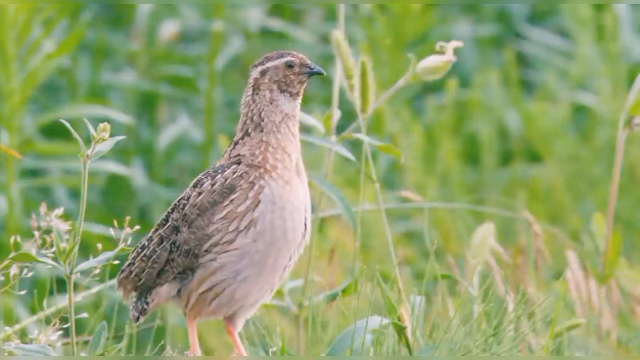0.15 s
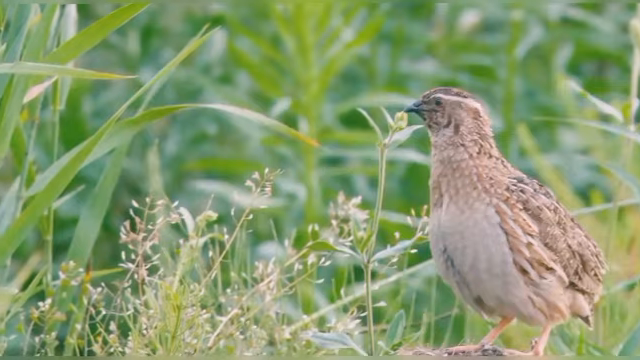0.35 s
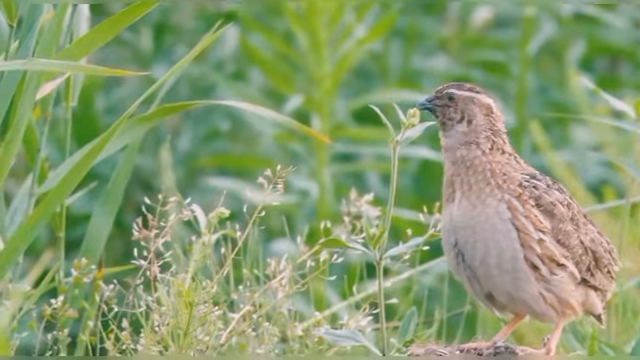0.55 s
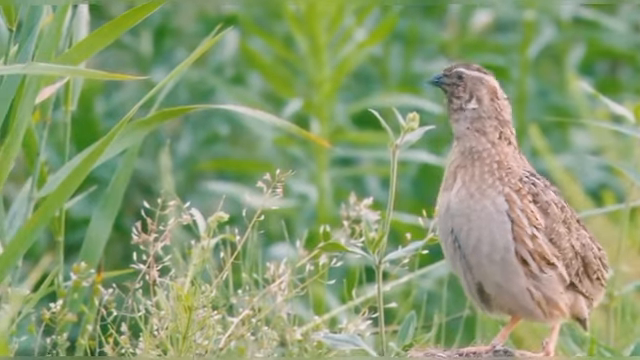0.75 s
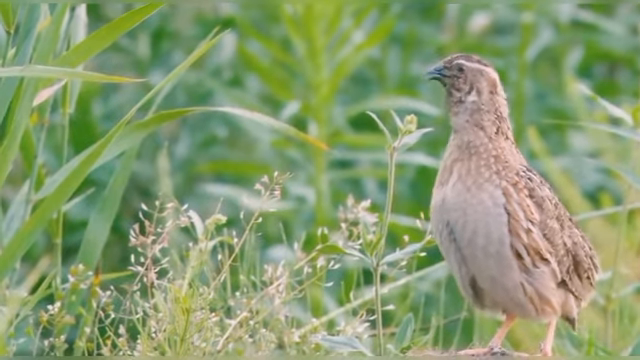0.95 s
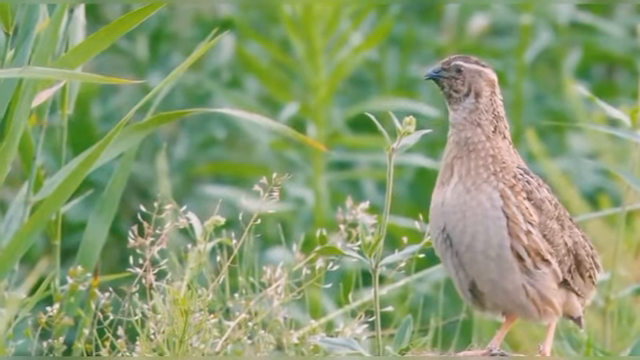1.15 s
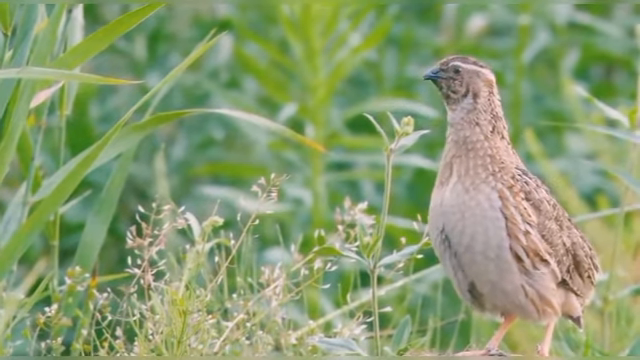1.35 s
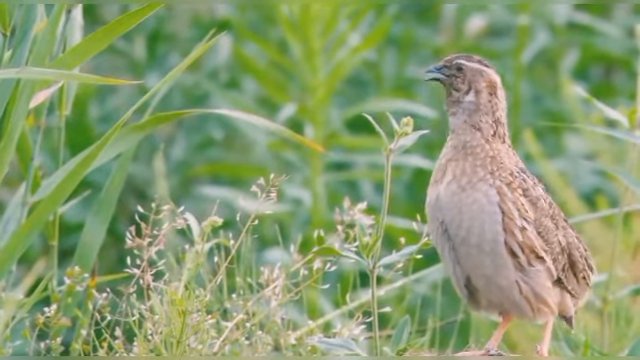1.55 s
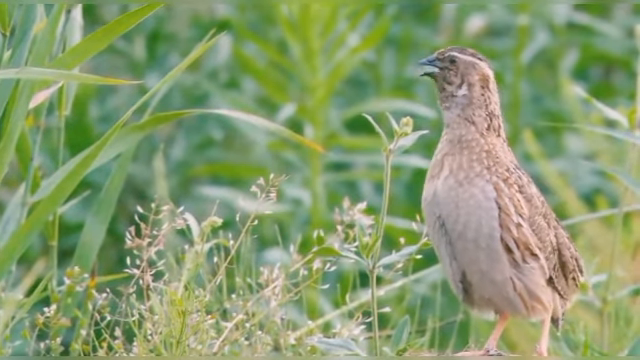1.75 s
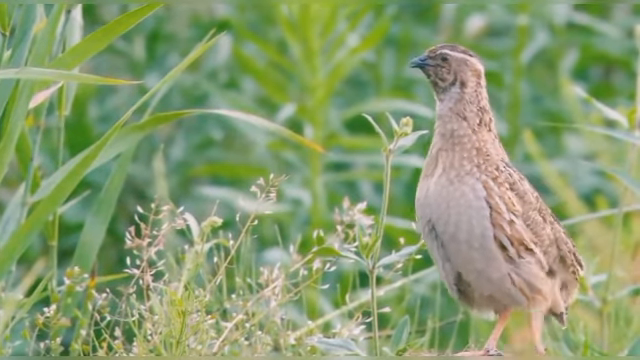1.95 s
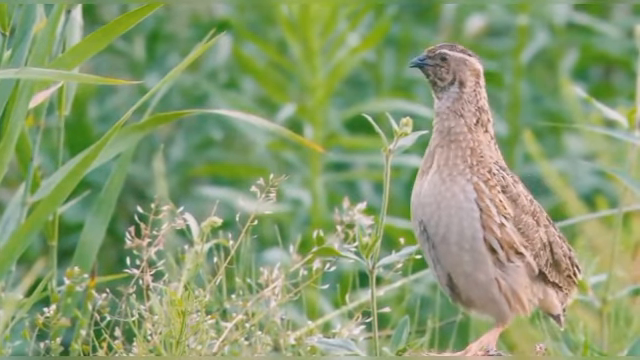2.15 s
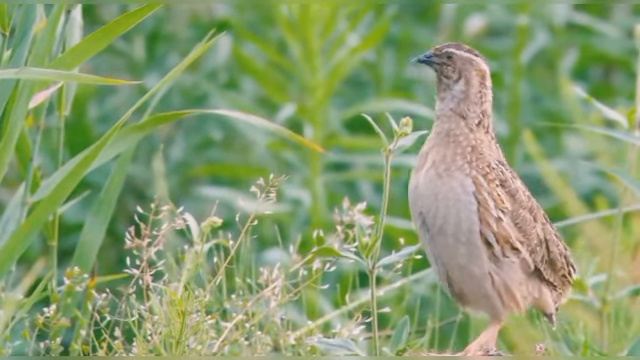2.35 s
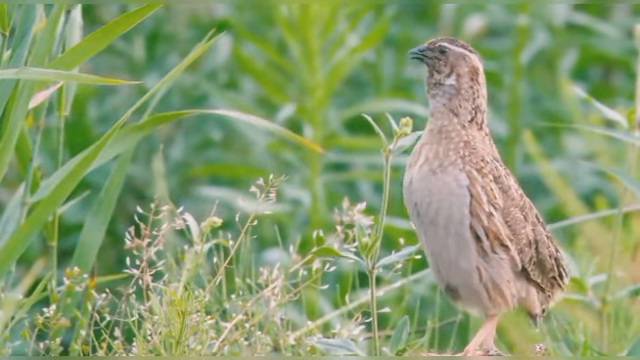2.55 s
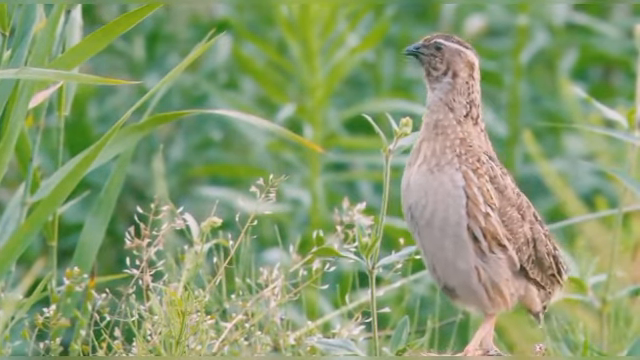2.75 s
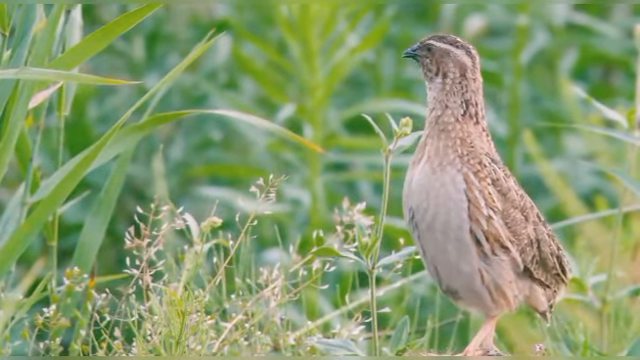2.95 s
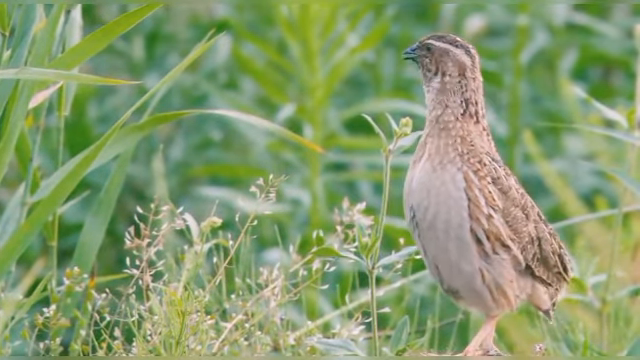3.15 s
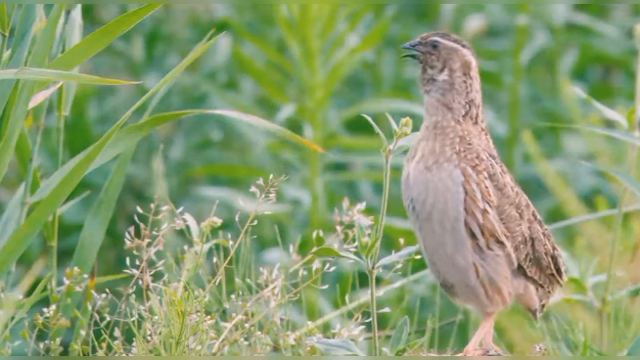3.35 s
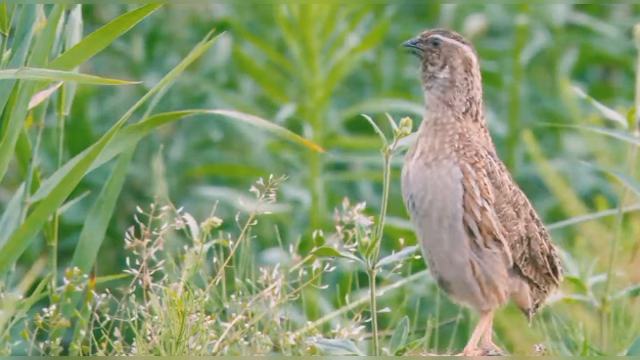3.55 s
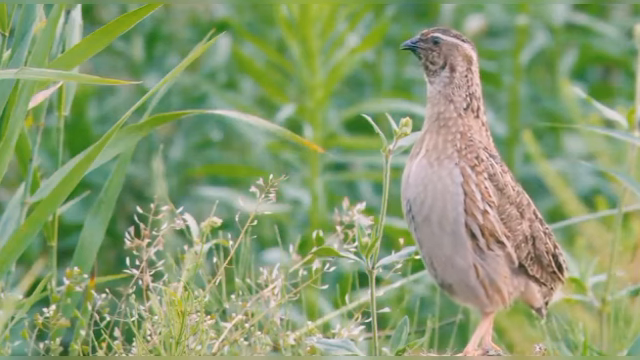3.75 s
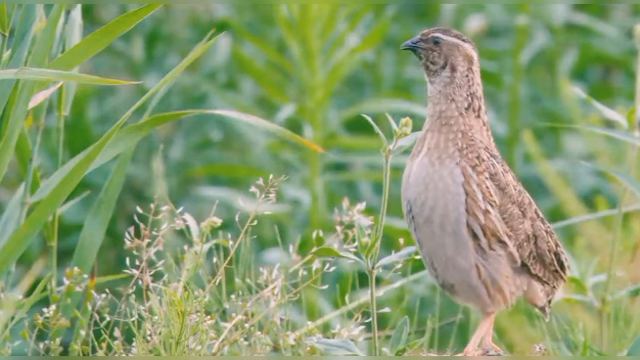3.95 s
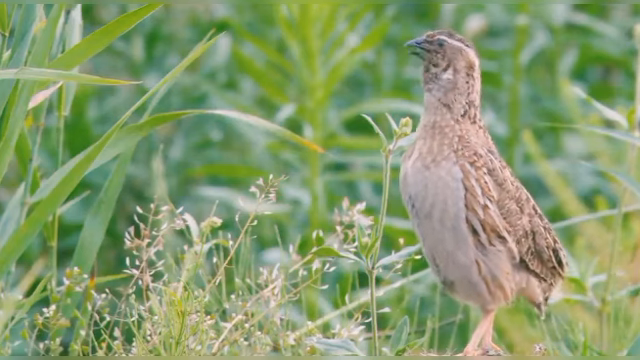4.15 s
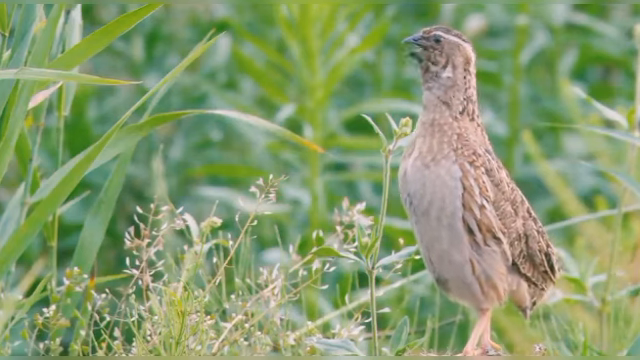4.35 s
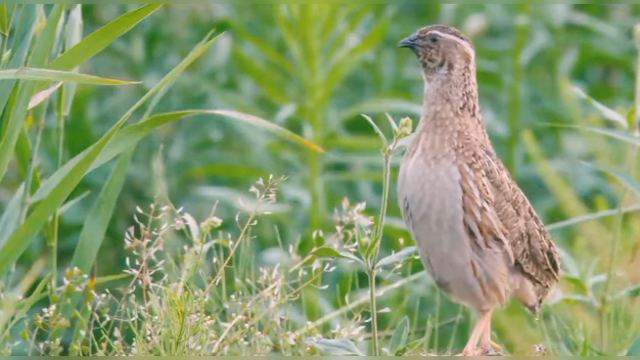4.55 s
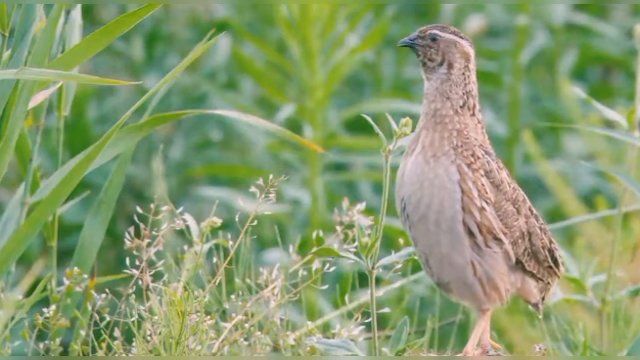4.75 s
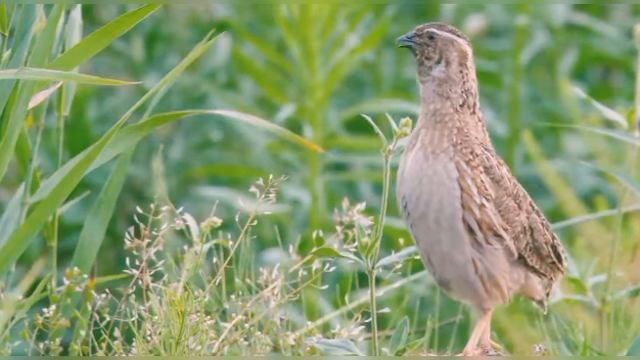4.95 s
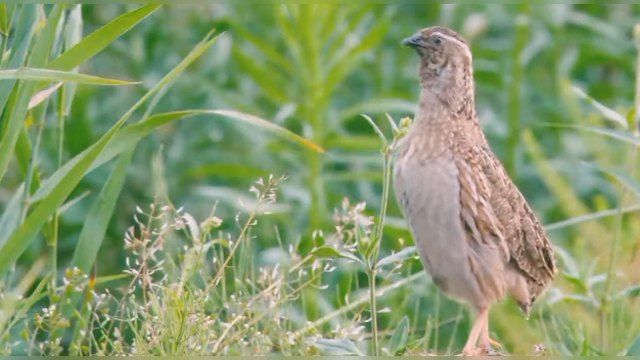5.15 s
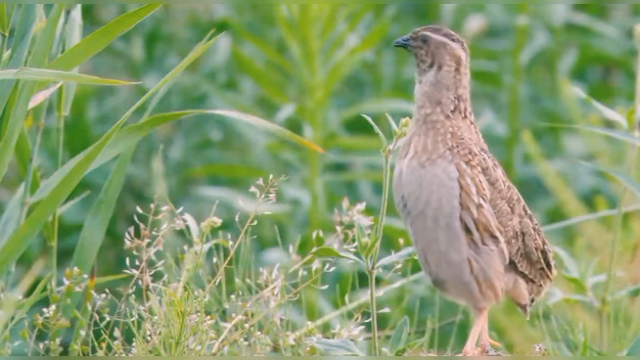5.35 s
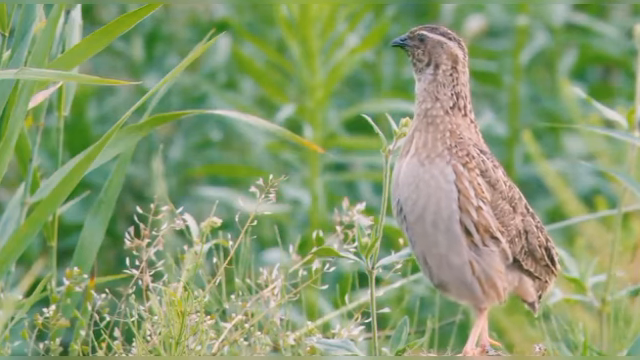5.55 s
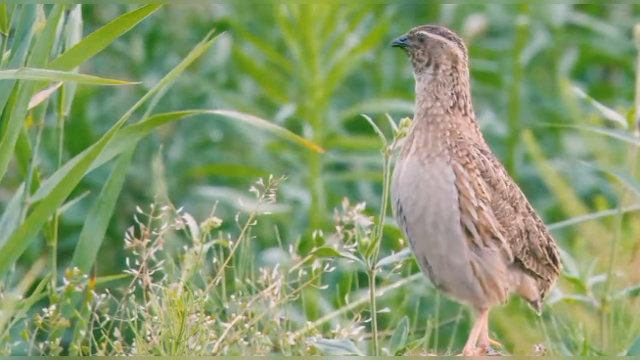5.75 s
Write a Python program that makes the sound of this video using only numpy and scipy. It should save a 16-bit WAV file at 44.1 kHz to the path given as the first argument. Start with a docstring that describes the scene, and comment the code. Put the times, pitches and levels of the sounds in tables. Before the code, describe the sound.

A nearby quail gives six short, hoarse, whistled calls at even intervals in a meadow, over soft hiss and very faint insects.

```python
"""Quail calling in a quiet meadow

A quail close by gives six hoarse calls, each pressed two to four times: a near-pure tone whose octave
flares when pressed, splits into subharmonics, catches and breaks into a rasp.
All its partials share one jittered phase; filtered noise adds hoarseness, and echoes surround it.
A fly's harmonics hum briefly, crickets tick and chirp as shaky tones, small birds chip as rising sweeps.
Faint tones, ticking stems, hiss and a soft rush lie behind."""
import sys
import numpy as np
from scipy import signal
from scipy.fft import rfft, irfft, next_fast_len
from scipy.io import wavfile
from scipy.ndimage import uniform_filter1d

SR = 44100
rng = np.random.default_rng(int(sys.argv[2]) if len(sys.argv) > 2 else 0)


def pcm_store(signal):
    """Save signal as 16-bit PCM."""
    levels = np.round(np.clip(np.atleast_2d(signal), -1, 1) * 32767)
    wavfile.write(sys.argv[1], SR, levels.astype(np.int16).T)


N = 259749
TIME = np.arange(N) / SR

# voice presses with period doubling, levels before trims: start_s, end_s, octave_db, third_harmonic_db,
# split_going_in_db, split_held_db, split_going_out_db
PRESSES = [(0.828, 0.907, -37, -36, -77, -46, -60), (0.968, 0.97, -13.5, -50, -55, -64, -71),
           (0.983, 1.038, -32, -32, -62, -42.5, -64), (1.092, 1.117, -30.5, -47.5, -50, -47, -64),
           (1.727, 1.786, -18, -37.5, -36, -58.5, -37.5), (1.818, 1.894, -15.5, -44.5, -41, -50.5, -74),
           (1.893, 1.961, -19.5, -36.5, -58, -35, -50), (2.57, 2.638, -13.5, -36.5, -32.5, -45, -36.5),
           (2.647, 2.701, -26, -44, -57, -48.5, -47.5), (2.741, 2.821, -14.5, -37.5, -53, -27, -46.5),
           (3.458, 3.517, -8.5, -33, -28.5, -36.5, -28), (3.616, 3.691, -13, -34.5, -31.5, -20, -48),
           (4.34, 4.401, -14, -39, -31.5, -33, -34), (4.403, 4.425, -17.5, -49, -46, -37, -53),
           (4.495, 4.575, -16.5, -41.5, -45.5, -23.5, -40.5), (5.211, 5.286, -14, -38.5, -33.5, -36.5, -48),
           (5.369, 5.446, -17, -40.5, -41, -23, -45)]
# upper harmonics before brightening: multiple, relaxed_db (re fundamental), pressed_db (re octave)
OVERTONES = [(4, -46, -40), (5, -31, -50.5), (6, -39.5, -53.5)]
# relative spectrum of the hoarseness: freq_hz, level_db
THROAT_COLOUR = [(250, -47.5), (480, -3), (700, -10), (950, 10.5), (1250, -11.5), (1600, -4.5),
                 (1850, -2.5), (2300, 1), (2700, -10), (3100, -18), (3500, -32.5), (5000, -49.5),
                 (6500, -57), (9000, -69.5)]
PRESS_RISE_DB = 2  # octave growth through a press
REEL_FAINT_HZ, REEL_FULL_HZ, REEL_RATE_HZ = 118.44, 189.4, 220  # pitch throw at faint and full rasp; its rate
HALF_DB_PER_HZ = 0.038  # line an octave down grows with pitch
MID_HZ, BRIGHT_DB_PER_HZ = 930, 0.026  # upper voice brightens with pitch


def quail():
    """One vibrating membrane: relaxed, pressed, period-doubled or chaotic."""
    pitch, level = voice_controls()
    stall, slip = catches(width_s=0.0025)
    rasp, centre = rasps()
    chaos = rasp / (rasp + level + 1e-6)
    jitter = (.004 + .018 * chaos) * wander(140)
    turn = 2 * np.pi * (np.cumsum(pitch * (1 + jitter)) / SR + slip)

    def partial(multiple):
        """A shimmering line; higher partials are hazier."""
        shimmer = gain_of(min(multiple, 3) * .45 * wander(50))
        blur = 0.0071 * multiple ** 2 * wander(250)
        phase = multiple * turn + blur + rng.uniform(0, 2 * np.pi)
        return shimmer * np.sqrt(2) * np.cos(phase)

    # pressing flares the octave, which sits on the throat's main resonance
    half_rise_db = PRESS_RISE_DB / 2
    octave_rows = [(a, b, db - half_rise_db, db + half_rise_db) for a, b, db, *_ in PRESSES]
    octave = episodes(octave_rows, edge_s=0.0064)
    third = episodes([(a, b, db, db) for a, b, _, db, *_ in PRESSES], edge_s=0.011)
    relaxed = level * np.exp(-octave / (level + 1e-6))
    # octave peaks as a press takes hold and as it lets go
    flare_starts = [s for a, b, *_ in PRESSES for s in (a + .001, b - .012)]
    flare_db = 2.5 * episodes([(s, s + 0.0059, 0, 0) for s in flare_starts], edge_s=0.0025)
    tone = (octave * gain_of(flare_db - 3.5) + gain_of(-10) * relaxed) * partial(2)
    tone += (third + gain_of(-23) * relaxed) * partial(2.997)

    upper = overtones(level, octave, partial)
    # period doubling puts lines between the harmonics, strongest beside the octave
    for cycles, under, over in splits():
        tone += under * partial(2 - 1 / cycles) + over * partial(2 + 1 / cycles)
        if cycles == 2:
            tone += gain_of(-16 + HALF_DB_PER_HZ * (pitch - MID_HZ)) * under * partial(.5)
            upper += over * (gain_of(-23) * partial(7 / 2) + gain_of(-34) * partial(9 / 2))
        else:
            tone += gain_of(-5) * over * partial(3 - 1 / cycles)

    # in chaos the harmonics sink under a reeling tone at the throat's resonance
    throw_hz = np.interp(rasp, [0, .08], [REEL_FAINT_HZ, REEL_FULL_HZ])
    reel = shaky_tone(centre, spread_hz=throw_hz, rate_hz=REEL_RATE_HZ) * gain_of(wander(300))
    tone = tone * gain_of(-3 * chaos) + rasp * evened(windpipe(reel, low_hz=410, high_hz=3280))
    upper += (gain_of(-34) * rasp + gain_of(-50) * octave) * band(3700, 780)
    # air hisses faintly through the open bill
    bill_hiss = gain_of(-43) * band(10250, 800) + gain_of(-39) * band(4500, 1600)
    upper += (level + 0.25 * octave) * bill_hiss
    upper *= gain_of(BRIGHT_DB_PER_HZ * (pitch - MID_HZ))
    # a full fundamental is rounder, with less treble
    tone += level * partial(0.99) + upper * gain_of(-28.5) / (level + gain_of(-29.5))
    # hoarse noise follows the loudness of the voice and rasp
    hoarse = gain_of(-10.5) * rasp + gain_of(-24.5) * level + gain_of(-36.5) * octave
    tone += hoarse * noise(THROAT_COLOUR)
    # where the tone is barely formed, the rasp is a lower, huskier puff
    tone += gain_of(5) * np.minimum(rasp, gain_of(-50)) * noise(HUSKY_COLOUR)
    return windpipe(tone * stall, low_hz=470, high_hz=14070)


# calls: start_s, end_s, fundamental_db (before arch and carry), rasp_lead_s, opening_rasp_db, closing_rasp_db
CALLS = [(0.766, 1.145, -31.5, 0.011, -53.5, -46.5), (1.655, 2.031, -29.5, 0.0053, -52.5, -36),
         (2.499, 2.873, -26.5, 0.0093, -48, -30.5), (3.394, 3.747, -21.5, 0.016, -40, -23.5),
         (4.266, 4.633, -29, 0.0055, -51.5, -35.5), (5.144, 5.501, -27, 0.0045, -50.5, -28.5)]
# voice pitch before smoothing and jitter, one curve a call: time_s, pitch_hz
PITCH_CURVES = [
    [(0.786, 770), (0.93, 807), (0.972, 861), (0.976, 835.5), (1.056, 819), (1.098, 835.6), (1.134, 717)],
    [(1.66, 740.5), (1.708, 868), (1.726, 951), (1.738, 890), (1.764, 874), (1.808, 940.6), (1.848, 930),
     (1.86, 913), (1.938, 902), (1.966, 834), (2.016, 790)],
    [(2.497, 803), (2.529, 886), (2.535, 860), (2.573, 1022), (2.583, 929), (2.677, 958), (2.725, 907),
     (2.745, 986), (2.793, 955), (2.829, 849), (2.867, 845)],
    [(3.404, 847), (3.426, 878), (3.458, 1040), (3.47, 969.5), (3.578, 950), (3.584, 937), (3.65, 1011),
     (3.654, 967), (3.692, 985), (3.704, 847), (3.744, 853.6)],
    [(4.272, 799), (4.336, 1035), (4.36, 953), (4.392, 984), (4.45, 941), (4.468, 886), (4.51, 1007),
     (4.546, 1018), (4.558, 940), (4.57, 949), (4.596, 802), (4.626, 850)],
    [(5.148, 810), (5.182, 885), (5.214, 1042), (5.228, 956), (5.286, 984), (5.334, 890), (5.378, 1009),
     (5.408, 1001), (5.412, 962.5), (5.446, 1010), (5.454, 845), (5.496, 813.6)],
]
# how well the fundamental carries: pitch_hz, gain_db
CARRY = [(740, -6.5), (820, -0.5), (900, 0.5), (955, -0.5), (1020, -2)]
ATTACK_S, ATTACK_DB, RELEASE_S, RELEASE_DB = .02, -17.5, 0.02, -17.5  # dB before the arch trim
ARCH_DB = 3  # mid call fuller than its ends


def voice_controls():
    """Pitch and amplitude of the fundamental: each call swells, arches and dies."""
    pitch, level = np.zeros(N), np.zeros(N)
    for (start, end, db, *_), curve in zip(CALLS, PITCH_CURVES):
        later = TIME > start - .1
        pitch[later] = np.interp(TIME[later], *np.transpose(curve))
        shape_s = [start, start + ATTACK_S, (start + end) / 2, end - RELEASE_S, end]
        shape_db = np.interp(TIME, shape_s, [ATTACK_DB, 0, ARCH_DB, 0, RELEASE_DB])
        level += episodes([(start, end, db, db)], edge_s=0.0038) * gain_of(shape_db - ARCH_DB / 2)
    pitch = uniform_filter1d(pitch, size=200)
    return pitch, level * gain_of(read(CARRY, pitch))


def overtones(level, octave, partial):
    """Weak upper harmonics flicker, passing only while the bill is wide open in mid call."""
    sounding = (level > gain_of(-50)) * 1.
    bill = np.maximum(2 * uniform_filter1d(sounding, size=7000) - 1, 0)
    upper = np.zeros(N)
    for multiple, relaxed_db, pressed_db in OVERTONES:
        flicker = gain_of(3 * np.clip(wander(45), -2, 1.5))
        strength = level * gain_of(relaxed_db) + octave * gain_of(pressed_db)
        upper += strength * bill * flicker * partial(round(multiple))
    return upper


# growls, vibration repeating every fourth cycle: start_s, end_s, level_db
GROWLS = [(0.855, 0.915, -46), (1.918, 1.949, -29.5), (2.756, 2.786, -26.5)]
SPLIT_LEAD_S, SPLIT_OVERLAP_S, SPLIT_TRAIL_S = 0.019, .005, .055  # before, into and after a press
SPLIT_FADE_DB = -7  # over the trailing split
HELD_UNDER_DB, GROWL_UNDER_DB = -16, -14  # line under the octave re the one over it
EARLY_START_S, EARLY_END_S, EARLY_SPLIT_DB = 0.014, 0.047, -21.5  # light doubling: time into call, dB re call


def splits():
    """Lines under and over the octave, by the number of cycles after which the voice repeats."""
    early = [(s + EARLY_START_S, s + EARLY_END_S, db + EARLY_SPLIT_DB, db + EARLY_SPLIT_DB)
             for s, _, db, *_ in CALLS]
    going_in = [(a - SPLIT_LEAD_S, a + SPLIT_OVERLAP_S, db, db) for a, *_, db, _, _ in PRESSES]
    going_out = [(b, b + SPLIT_TRAIL_S, db, db + SPLIT_FADE_DB) for _, b, *_, db in PRESSES]
    passing = episodes(early + going_in + going_out, edge_s=.007)
    held = episodes([(a + .009, b - .012, db, db) for a, b, *_, db, _ in PRESSES], edge_s=.008)
    growl = episodes([(a, b, db, db) for a, b, db in GROWLS], edge_s=.007)
    doubled = (2, passing + gain_of(HELD_UNDER_DB) * held, passing + held)
    return [doubled, (4, gain_of(GROWL_UNDER_DB) * growl, growl)]


# hardest presses break into chaos: start_s, end_s, mid_level_db, rasp_centre_hz
BREAKS = [(3.521, 3.543, -19.5, 1870), (3.622, 3.662, -14.5, 2130), (3.685, 3.699, -21, 1870),
          (4.388, 4.442, -30, 1900), (4.544, 4.563, -21, 1970), (5.279, 5.305, -22.5, 1870),
          (5.384, 5.418, -20.5, 2160), (5.438, 5.453, -26, 1790)]
OPENING_S, CLOSING_S, TRAIL_S = 0.064, .016, 0.0057  # rasp into the call, before its end, after its end
CLOSING_FADE_DB, BREAK_FADE_DB = -11.5, -6
EDGE_RASP_HZ = 1700  # centre of opening and closing rasps


def rasps():
    """Amplitude and centre of the chaos at both ends of each call and in the breaks."""
    opening = [(a - lead_s, a + OPENING_S, db, db) for a, _, _, lead_s, db, _ in CALLS]
    closing = [(b - CLOSING_S, b + TRAIL_S, db, db + CLOSING_FADE_DB) for _, b, *_, db in CALLS]
    broken = [(a, b, db - BREAK_FADE_DB / 2, db + BREAK_FADE_DB / 2) for a, b, db, _ in BREAKS]
    centre = np.full(N, float(EDGE_RASP_HZ))
    for a, b, _, hz in BREAKS:
        centre[abs(TIME - (a + b) / 2) < (b - a + CLOSING_S) / 2] = hz
    return episodes(opening + closing, edge_s=.0025) + episodes(broken, edge_s=0.0037), centre


CATCH_AFTER_S, CATCH_EVERY_S, CATCH_DB = 0.007, .026, 7  # first stall in a break, repeat, dip depth


def catches(width_s):
    """A broken voice stalls: the level dips and the vibration restarts out of step."""
    dip_db, slip = np.zeros(N), np.zeros(N)
    stalls = [np.arange(a + CATCH_AFTER_S, b, CATCH_EVERY_S) for a, b, *_ in BREAKS]
    for s in np.concatenate(stalls):
        near = slice(int((s - .02) * SR), int((s + .02) * SR))
        bell = np.exp(-((TIME[near] - s) / width_s) ** 2)
        dip_db[near] += CATCH_DB * bell
        slip[near] += .25 * rng.uniform(-1.1, 1) * bell / bell.sum()  # cycles
    return gain_of(-dip_db), np.cumsum(slip)


def windpipe(x, low_hz, high_hz):
    """The small throat passes little under low_hz or over high_hz."""
    sos = signal.butter(N=4, Wn=[low_hz, high_hz], btype="band", fs=SR, output="sos")
    return signal.sosfiltfilt(sos, x)


def leaf_echo(x, delay_s, level_db):
    """A nearby leaf throws the upper voice back, with opposite sign at each side."""
    bright = signal.sosfilt(signal.butter(6, 2200, "high", fs=SR, output="sos"), x)
    return gain_of(level_db) * np.interp(TIME - delay_s, TIME, bright) * np.array([[1], [-1]])


# decay time of the far tail: freq_hz, t60_s
FIELD_T60 = [(300, 1.1), (900, 0.23), (2200, 0.35), (6000, 0.11)]


def field(x, far_db):
    """Plants scatter the call back at once; a faint tail returns from farther off."""
    t = np.arange(SR) / SR
    taps = rng.standard_normal((2, SR)) * (rng.random((2, SR)) < 2000 / SR)
    taps = taps[:1] + .5 * np.array([[1], [-1]]) * taps[1:]  # shared part plus opposed part
    near = taps * gain_of(-60 * t / .07) * np.minimum(t / 0.0098, 1)
    near *= gain_of(-22) / np.linalg.norm(near[0])
    hz, s, z = signal.stft(taps, SR, nperseg=256)
    decay = gain_of(-60 * s / read(FIELD_T60, hz)[:, None])
    far = signal.istft(z * decay, SR, nperseg=256)[1][:, :SR]
    echoes = near + gain_of(far_db) * far / np.linalg.norm(far[0])
    return signal.fftconvolve(x[None], echoes, axes=1)[:, :N]


# hum lines before the fly's envelope: wingbeat_multiple, level_db
FLY_LINES = [(2, -79.5), (3, -82), (4, -74), (5, -73), (6, -72), (7, -70), (8, -75), (9, -84), (10, -82),
             (11, -81)]


def fly(wing_hz):
    """A fly's wingbeat, a wavering harmonic series, hums briefly."""
    turn = 2 * np.pi * np.cumsum(wing_hz * (1 + 0.0087 * wander(18))) / SR
    hum = np.zeros(N)
    for multiple, db in FLY_LINES:
        phase = round(multiple) * turn + rng.uniform(0, 2 * np.pi)
        hum += gain_of(db) * np.sqrt(2) * np.cos(phase)
    envelope = episodes([(.414, .74, 6.5, 1.5)], edge_s=0.0017)
    return (hum + gain_of(-74) * noise(HUSKY_COLOUR)) * envelope


# bush cricket's double ticks: time_s, level_db
TICK_LEVELS = [(0, -73), (1.9, -72.5), (3.9, -67), (4.3, -58.5), (5.1, -58.5), (5.5, -61.5), (5.89, -63.5)]
# distant cricket's chirps: start_s, end_s, level_db
CHIRPS = [(0, .08, -66.5), (0.306, 0.392, -68), (0.645, 0.69, -69), (1.367, 1.466, -75)]


def crickets(tick_hz, chirp_hz):
    """A bush cricket closes its wings in pairs of strokes; another cricket chirps farther away."""
    strokes = (np.arange(.1015, 5.87, .0908)[:, None] + [0, .029]).ravel()
    levels = np.interp(strokes, *np.transpose(TICK_LEVELS))
    ticks = episodes([(s - .003, s + .004, db, db) for s, db in zip(strokes, levels)], edge_s=.0015)
    scrape = shaky_tone(tick_hz, spread_hz=330, rate_hz=990)
    chirps = episodes([(a, b, db, db) for a, b, db in CHIRPS], edge_s=0.0068)
    return ticks * scrape + chirps * shaky_tone(chirp_hz, spread_hz=137, rate_hz=110)


# rising chips: centre_s, peak_db
CHIPS = [(1.217, -56), (1.34, -58), (2.282, -56), (2.408, -60)]


def small_bird(low_hz, high_hz, length_s):
    """Quick thin upward sweeps under a bell envelope."""
    out = np.zeros(N)
    for s, db in CHIPS:
        hz = np.interp(TIME, [s - length_s / 2, s + length_s / 2], [low_hz, high_hz])
        bell = np.exp(-(2 * (TIME - s) / length_s) ** 2)
        out += gain_of(db) * bell * np.sin(2 * np.pi * np.cumsum(hz) / SR)
    return out


# faint tones: start_s, end_s, pitch_hz, mid_level_db
FAINT_TONES = [(2.418, 2.535, 287, -68), (3.626, 4.006, 286.8, -71), (3.78, 3.97, 698.5, -61),
               (3.8, 3.994, 559.6, -72), (4.615, 4.763, 2540, -66.5), (5.125, 5.193, 280, -70)]


def faint_tones():
    """Thin faint wavering tones: narrow bands of noise, each fading by 4 dB."""
    out = np.zeros(N)
    for a, b, hz, db in FAINT_TONES:
        out += episodes([(a, b, db + 2, db - 2)], edge_s=.015) * band(hz, hz / 60)
    return out


def grass(per_s, level_db):
    """Stems tick faintly, here and there: random band-passed clicks, leaning left."""
    clicks = (rng.random((2, N)) < per_s / SR) * gain_of(5 * np.minimum(rng.exponential(1, (2, N)), 4))
    ticks = signal.sosfilt(signal.butter(2, [7000, 15000], "band", fs=SR, output="sos"), clicks)
    return gain_of(level_db) * evened(ticks + 0.45 * ticks[::-1]) * gain_of([[1.5], [-1.5]])


# relative hiss spectrum: freq_hz, density_db_per_hz
AIR_COLOUR = [(15, -85.5), (25, -51.5), (70, -15), (122, -5), (215, -10.5), (273, -6.5), (321, -8.5),
              (507, -3.5), (646, -4.5), (845, -3), (1080, -5), (1170, -4), (2830, -7), (8760, -9.5),
              (14200, -9.5), (15400, -10.5)]
# left-right correlation of the hiss: freq_hz, likeness
AIR_LIKENESS = [(230, 0.95), (450, 0.91), (2000, 0.6), (4500, 0.44), (9000, 0.48), (11500, 0.27),
                (15000, 0.25)]
# balance of the hiss: freq_hz, left_minus_right_db
AIR_BALANCE = [(200, -0.5), (640, 1), (1410, 1), (3100, -0.5), (6820, 0), (15000, 2)]
# swelling and sinking rush, before flutter: time_s, level_db
RUSH_LEVELS = [(.7, -83), (1.25, -67), (1.6, -74.5), (2.35, -62.5), (3.15, -66.5), (3.87, -66.5),
               (4.05, -77), (4.22, -71), (4.95, -62), (5.89, -76)]
# relative spectrum of a dull, husky noise: freq_hz, level_db
HUSKY_COLOUR = [(200, -21), (430, -12), (560, -12), (750, -5), (1000, -8.5), (1400, -10), (2200, -17.5),
                (4000, -42.5)]
AIR_DB = -59.5


def air():
    """Even hiss, wider in the treble, and a soft rush in the middle; the level dips briefly once."""
    hz, _, z = signal.stft(rng.standard_normal((2, N)), SR, nperseg=2048)
    same = np.clip(read(AIR_LIKENESS, hz), 0, 1)[:, None]
    mid, side = z[0] * np.sqrt(1 + same), z[1] * np.sqrt(1 - same)
    lean = gain_of(read(AIR_BALANCE, hz) / 2)[:, None]
    pair = np.array([(mid + side) * lean, (mid - side) / lean])
    pair *= gain_of(read(AIR_COLOUR, hz))[:, None]
    hiss = signal.istft(pair, SR, nperseg=2048)[1][:, :N]
    hiss *= gain_of(AIR_DB + .5 * wander(60) + .2 * wander(6)) / np.std(hiss.mean(0))
    rush_db = np.interp(TIME, *np.transpose(RUSH_LEVELS)) + 1.2 * wander(14)
    rush = gain_of(rush_db) * noise(HUSKY_COLOUR)
    dip_db = -9 * episodes([(.402, .413, 0, 0)], edge_s=0.0011)
    return (hiss + rush) * gain_of(dip_db)


def gain_of(db):
    """Amplitude ratio from dB."""
    return 10 ** (np.asarray(db) / 20)


def evened(x):
    """Scale to unit RMS."""
    return x / np.sqrt(np.mean(x ** 2) + 1e-20)


def read(points, hz):
    """A curve joined by straight lines over log frequency."""
    f, value = np.transpose(points)
    return np.interp(np.log(hz + 1), np.log(f + 1), value)


def noise(colour):
    """Noise of unit power with the given spectrum."""
    size = next_fast_len(N)
    spectrum = rfft(rng.standard_normal(size))
    spectrum *= gain_of(read(colour, np.fft.rfftfreq(size, 1 / SR)))
    return evened(irfft(spectrum, size)[:N])


def wander(rate_hz):
    """Smooth chance of unit size: low-passed noise."""
    sos = signal.butter(2, rate_hz, fs=SR, output="sos")
    return evened(signal.sosfilt(sos, rng.standard_normal(N)))


def band(hz, width_hz):
    """A narrow band of noise: a carrier with random quadratures."""
    turn = 2 * np.pi * hz * TIME
    return evened(wander(width_hz / 2) * np.cos(turn) + wander(width_hz / 2) * np.sin(turn))


def shaky_tone(hz, spread_hz, rate_hz):
    """A tone whose pitch is thrown about at random."""
    return np.sqrt(2) * np.cos(2 * np.pi * np.cumsum(hz + spread_hz * wander(rate_hz)) / SR)


def episodes(rows, edge_s):
    """Amplitude from rows (start_s, end_s, first_db, last_db), with soft edges."""
    out = np.zeros(N)
    for start, end, first_db, last_db in rows:
        near = slice(max(int((start - 10 * edge_s) * SR), 0), int((end + 10 * edge_s) * SR))
        t = TIME[near]
        gate = (1 + np.tanh((t - start) / edge_s)) * (1 + np.tanh((end - t) / edge_s)) / 4
        out[near] += gate * gain_of(np.interp(t, [start, end], [first_db, last_db]))
    return out


def scene():
    """The quail with its echoes, over the meadow."""
    bird = quail()
    meadow = air() + grass(per_s=190, level_db=-71.5) + fly(wing_hz=177.2) + faint_tones()
    meadow += crickets(tick_hz=8800, chirp_hz=4670)
    meadow += small_bird(low_hz=1530, high_hz=2547, length_s=0.021)
    return bird + leaf_echo(bird, delay_s=.0031, level_db=-22) + field(bird, far_db=-30) + meadow


EDGE_HZ = 15450


def record(dry):
    """Low-pass at EDGE_HZ: the recorder's band limit."""
    lowpass = signal.firwin(511, EDGE_HZ, window=("kaiser", 9), fs=SR)
    return signal.oaconvolve(dry, lowpass[None], "same")


dry = scene()
out = record(dry)
pcm_store(out)
```